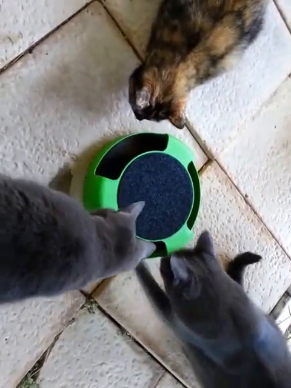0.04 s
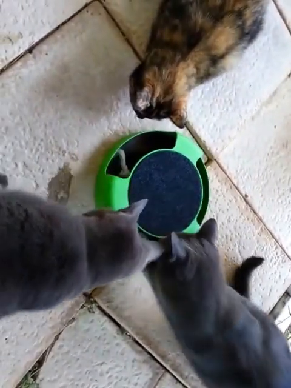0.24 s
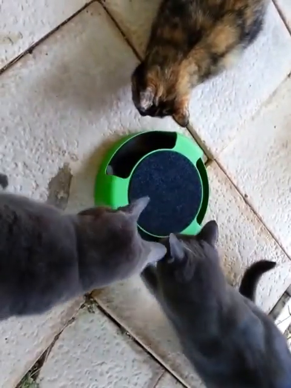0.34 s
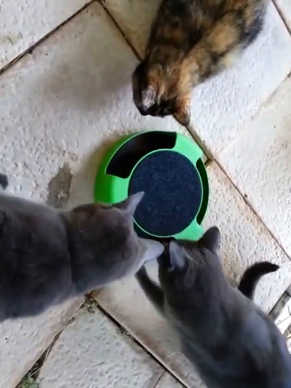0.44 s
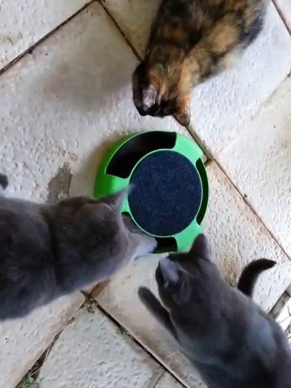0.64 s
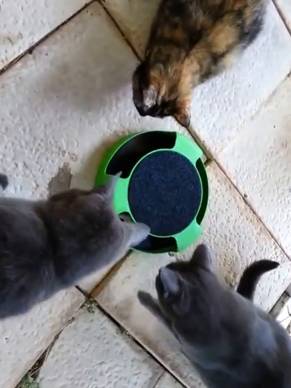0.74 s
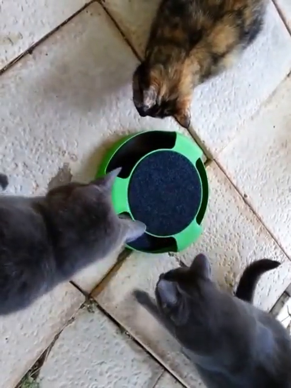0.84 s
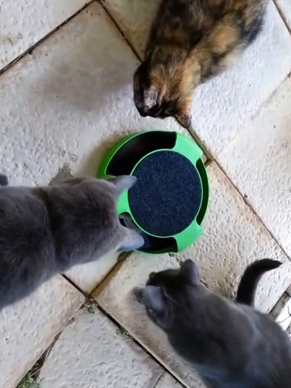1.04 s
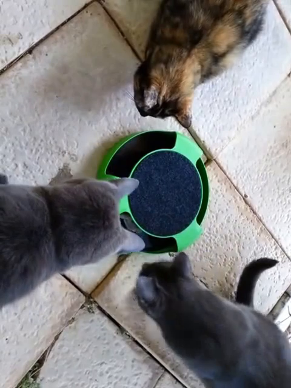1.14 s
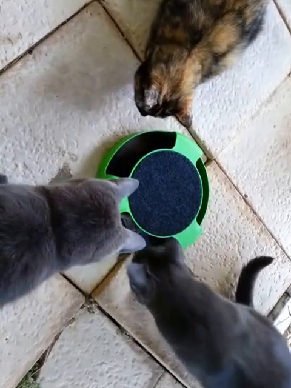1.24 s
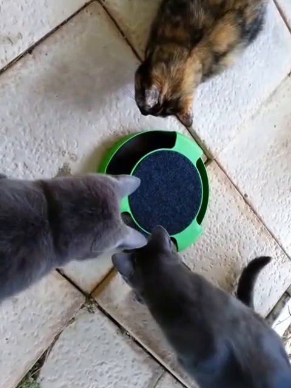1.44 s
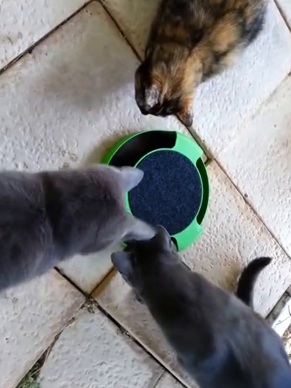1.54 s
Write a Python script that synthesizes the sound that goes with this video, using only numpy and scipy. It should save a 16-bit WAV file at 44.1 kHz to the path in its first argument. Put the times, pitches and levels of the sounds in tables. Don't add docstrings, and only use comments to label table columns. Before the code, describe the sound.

A hollow plastic cat toy is shoved across floor tiles in one quick clattering scrape, then near silence: soft hiss, faint bird whistles, tiny claw ticks, a distant low engine; close stereo phone microphone in a tiled room.

```python
import sys
import numpy as np
from scipy import signal
from scipy.fft import rfft, irfft
from scipy.io import wavfile
from scipy.ndimage import uniform_filter1d

SR = 44100
rng = np.random.default_rng(int(sys.argv[2]) if len(sys.argv) > 2 else 0)


def makeup_ratio(level_db):
    decades = np.asarray(level_db, float) / 20
    return 10 ** decades


def unload_wav(signal):
    wavfile.write(
        sys.argv[1],
        SR,
        np.round(np.clip(np.atleast_2d(signal).T, -1, 1) * 32767).astype(np.int16),
    )


N = 70560


def evened(x):
    return x / np.sqrt(np.mean(x ** 2) + 1e-20)


def read(points, hz):
    f, value = np.transpose(points)
    return np.interp(np.log(hz + 1), np.log(f + 1), value)


def add(mix, s, sound):
    part = mix[..., round(s * SR):][..., :sound.shape[-1]]
    part += sound[..., :part.shape[-1]]


def colour(x, db_of_hz):
    return irfft(rfft(x) * makeup_ratio(db_of_hz(np.fft.rfftfreq(N, 1 / SR))), N)


def ring(modes, db, luck):
    contact_s, detune, spread_db = 0.00071, 0.0082, 2
    scatter_rad = 0.71
    turn_rad, turn_hz = 0.52, 1200
    t = np.arange(6000) / SR
    side = np.array([[1], [-1]])
    swell = 1 - np.exp(-t / contact_s)
    out = np.zeros((2, len(t)))
    for (hz, mode_db, t60), (a, b, c, e) in zip(modes, luck):
        decay = makeup_ratio(db + mode_db + spread_db * a - 60 * t / max(t60, .003))
        phase = 2 * np.pi * hz * (1 + detune * b) * t + scatter_rad * c
        out += decay * swell * np.sin(phase + side * turn_rad * e * (hz > turn_hz))
    return out


# start_s, base_db, lid_db, shell_db, rim_db
KNOCKS = [(0.1715, -47.0, -51.0, -55.0, -55), (0.176, -56, -55.0, -41.5, -47.0),
          (0.1966, -49.0, -40, -32.0, -33.0), (0.201, -45, -53.0, -35.0, -61),
          (0.206, -41, -42, -40.5, -44), (0.2165, -41.0, -52, -40.5, -46), (0.222, -44, -48.0, -41, -49),
          (0.226, -39.0, -39, -37.5, -42), (0.229, -26, -30.0, -36, -31.0), (0.2334, -21, -29, -37.0, -30),
          (0.238, -24.0, -35.0, -33, -37.0), (0.243, -12.0, -24, -20.5, -29),
          (0.2454, -11.5, -20, -26.5, -18), (0.2485, -17.5, -20, -36, -21.5),
          (0.2525, -30, -29, -33, -25.5), (0.2555, -21.0, -17.0, -25.5, -55.0),
          (0.2595, -19, -13.0, -24.5, -29), (0.263, -27, -15.0, -62.0, -29),
          (0.2665, -62.0, -29.0, -23.0, -31.0), (0.272, -41, -33, -29.5, -28.5),
          (0.276, -22.5, -27, -24.5, -29), (0.281, -23.0, -22.5, -26.5, -33.0),
          (0.286, -30.0, -26, -31, -38), (0.293, -19.0, -26, -33.0, -40), (0.2986, -16.0, -21.5, -30, -36),
          (0.301, -18, -16, -24.0, -39), (0.304, -19, -15.0, -30, -32.5), (0.311, -21.0, -23, -29.0, -33.5),
          (0.3134, -27, -24.0, -31.0, -29.5), (0.321, -23, -32.0, -36, -58),
          (0.326, -31, -36.0, -35.5, -48), (0.337, -32, -36, -45, -53), (0.35, -32.5, -49.0, -49, -55),
          (0.361, -44, -43.0, -54, -52.0), (0.381, -48.0, -45.0, -52.0, -49)]
# pitch_hz, level_db, t60_s
BASE_MODES = [(907.3, -2.5, .027), (845, -19, 0.031)]
LID_MODES = [(1029, -3.5, .023), (1148, -14, 0.019)]
SHELL_MODES = [(1307, -2.5, 0.029), (1446, 1, 0.022), (1621, 5.5, 0.022), (1713, 3.5, 0.027),
               (1878, -2.5, 0.028), (2110, -8.5, 0.01), (2275, -3.5, 0.041), (2430, -2.5, 0.022)]
RIM_MODES = [(2660, -4, 0.017), (2840, -3, .02), (3000, 4.5, 0.025), (3330, -3.5, 0.025), (3620, -1, 0.027),
             (3860, 5.5, 0.022), (4100, 1, 0.011), (4900, -23, 0.023), (6470, -20, 0.011),
             (7360, -13, 0.013), (7910, -12, 0.016), (8640, -13.5, .012), (9400, -17.5, 0.012)]


def toy():
    crack_db, crack_s, scatter_rad = -13.5, 0.0021, 0.71
    rings, cracks = np.zeros((2, N)), np.zeros(N)
    luck = rng.standard_normal((40, 2, 14, 4))
    crack = np.exp(-np.arange(600) / SR / crack_s)
    for (s, base_db, lid_db, shell_db, rim_db), (a, b) in zip(KNOCKS, luck):
        for modes, db in (BASE_MODES, base_db), (LID_MODES, lid_db):
            in_step = [(0, 0, 2 * np.pi * hz * s / scatter_rad, 0) for hz, _, _ in modes]
            add(rings, s, ring(modes, db, in_step))
        add(rings, s, ring(SHELL_MODES, shell_db, a) + ring(RIM_MODES, rim_db, b))
        add(cracks, s, makeup_ratio(rim_db + crack_db) * crack)
    return rings, cracks


# time_s, level_db
SKID_FORCE = [
    (.168, -65),
    (0.177, -53.5),
    (0.196, -52.5),
    (0.197, -46.5),
    (0.219, -46.5),
    (0.243, -39.5),
    (0.272, -36),
    (0.314, -49.5),
    (.37, -67),
]
# pitch_hz, level_db (per Hz)
GRIT_COLOUR = [(59, -57), (100, -20.5), (500, -14), (616, -20), (917, -11), (1200, -15.5), (3960, -17.5),
               (4580, -18.5), (14800, -41)]


def skid(cracks):
    grains_per_s, grain_s, spread_db, level_db, apart_hz = 5000, 0.0011, 2.5, 7.5, 1800
    sizes = makeup_ratio(spread_db * np.minimum(rng.exponential(1, N), 3))
    hits = sizes * (rng.random(N) < grains_per_s / SR)
    grain = np.exp(-np.arange(600) / SR / grain_s)
    texture = evened(np.sqrt(abs(signal.fftconvolve(hits ** 2, grain)[:N])))
    s, db = np.transpose(SKID_FORCE)
    force = makeup_ratio(level_db + np.interp(np.arange(N) / SR, s, db, -120, -120))
    force = force * texture + cracks
    a, b = evened(colour(rng.standard_normal((2, N)), lambda hz: read(GRIT_COLOUR, hz)))
    apart = colour(b - a, lambda hz: -10 * np.log10(1 + (apart_hz / (hz + 1)) ** 2) - 3)
    return force * np.array([a, a + apart])


# start_s, boom_db, hollow_db
THUMPS = [
    (0.198, -53, -43),
    (0.233, -36, -40),
    (0.242, -29, -37),
    (0.26, -49, -40),
    (.28, -37, -35),
    (0.298, -33, -38),
    (.325, -66, -37),
    (0.347, -46, -38),
]
# pitch_hz, level_db, t60_s
HOLLOW_MODES = [(213, -4.5, 0.088), (307, -1.5, 0.088), (360.7, 2, 0.069), (492, -3, 0.062),
                (740, -4.5, 0.048)]


def thumps():
    boom_hz, rise_s, t60_s = 139.7, 0.0062, 0.13
    out, t = np.zeros((2, N)), np.arange(12000) / SR
    luck = rng.standard_normal((12, 14, 4))
    for (s, boom_db, hollow_db), lot in zip(THUMPS, luck):
        shape = makeup_ratio(boom_db - 60 * t / t60_s) * (1 - np.exp(-t / rise_s)) ** 2
        add(out, s, shape * np.sin(2 * np.pi * boom_hz * (t + s)))
        add(out, s, ring(HOLLOW_MODES, hollow_db, lot))
    return out


# start_s, level_db, pitch_hz, t60_s
TICKS = [
    (0.0152, -44, 3280, 0.0083),
    (.048, -45, 3200, 0.0029),
    (.147, -47, 2820, 0.0065),
    (1.299, -46, 1100, .004),
    (1.308, -45, 1490, 0.0032),
    (1.417, -52, 3850, .006),
    (1.419, -45, 1300, 0.0027),
    (1.4192, -48, 2598, .0025),
    (1.552, -53, 3000, 0.012),
    (1.554, -48, 1600, .005),
]


def claws():
    out, t = np.zeros((2, N)), np.arange(2000) / SR
    for s, db, hz, t60 in TICKS:
        decay = makeup_ratio(db - 60 * t / max(t60, .002))
        add(out, s, np.ones((2, 1)) * decay * np.sin(2 * np.pi * hz * t))
    return out


# start_s, length_s, level_db, start_hz, end_hz
BIRD_NOTES = [(.01, 0.038, -63, 3020, 3000), (0.129, .02, -61, 3270, 3500), (.508, .012, -64, 2950, 3000),
              (.522, 0.018, -60, 3050, 3050), (0.543, 0.02, -64, 3060, 3000),
              (0.569, .025, -67, 3060, 3050), (0.663, .013, -63, 4630, 4560),
              (.674, 0.016, -54.5, 4540, 4450), (0.685, 0.0108, -55, 4350, 4050),
              (.702, 0.02, -60.5, 3440, 3580), (.719, 0.01, -55, 3520, 3450),
              (0.734, 0.013, -58, 3600, 3560), (.749, .011, -61, 3500, 3580),
              (0.712, 0.031, -61, 3060, 3250), (.745, 0.033, -64, 3050, 3000),
              (.796, .014, -63, 3200, 3180)]


def bird():
    fuzz_hz, pan_db = 130, 6
    out, luck = np.zeros((2, N)), rng.standard_normal((20, 2, 8000))
    r = np.exp(-2 * np.pi * fuzz_hz / SR)
    for (s, length, db, start_hz, end_hz), breath in zip(BIRD_NOTES, luck):
        t = np.arange(0, length, 1 / SR)
        a, b = [evened(signal.lfilter([1], [1, -2 * r, r * r], noise)) for noise in breath]
        flutter = 1 + 0.44 * a + .4j * b
        glide_hz = start_hz + (end_hz - start_hz) * t / length
        note = np.exp(2j * np.pi * np.cumsum(glide_hz) / SR)
        shape = np.sin(np.pi * t / length) * (note * flutter[-len(t):]).real
        add(out, s, makeup_ratio(db + pan_db * np.array([[.5], [-.5]])) * shape)
    return out


# time_s, pitch_hz, level_db
DRONE = [
    (1.118, 63.47, -110),
    (1.199, 72.33, -55.5),
    (1.27, 74.14, -62.5),
    (1.36, 75.1, -59.5),
    (1.448, 73.3, -61),
]
# multiple of pitch, level_db
DRONE_ORDERS = [(2, -2), (3, -3), (4, 0)]


def drone():
    t, (s, hz, db) = np.arange(N) / SR, np.transpose(DRONE)
    turns = np.cumsum(np.interp(t, s, hz)) / SR
    orders = sum(makeup_ratio(d) * np.sin(2 * np.pi * k * turns + k) for k, d in DRONE_ORDERS)
    return makeup_ratio(np.interp(t, s, db, -120, -120)) * orders


# pitch_hz, correlation (-1 to 1)
LIKENESS = [(60, 0.9), (180, 0.77), (540, 0.35), (1600, -0.14), (4790, -0.015), (14300, 0.037)]


def floor(spectrum, db, low_hz, high_hz, hum_db):
    hum_hz, hum_width_hz, patch_db = 161, 25, .8
    frames, hz = N // 512 + 5, np.fft.rfftfreq(2048, 1 / SR)
    a, b, c, d, patches = rng.standard_normal((frames, 1025, 5)).T
    patches = uniform_filter1d(uniform_filter1d(patches, size=8, axis=0), size=6, axis=1)
    same = np.clip(read(LIKENESS, hz), -1, 1)[:, None]
    left = a + 1j * b
    z = np.array([left, same * left + np.sqrt(1 - same ** 2) * (c + 1j * d)])
    shape = read(spectrum, hz) + hum_db * np.exp(-((hz - hum_hz) / hum_width_hz) ** 2)
    band = (hz > low_hz) & (hz <= high_hz)
    z *= makeup_ratio(shape[:, None] + patch_db * evened(patches)) * band[:, None]
    return makeup_ratio(db) * evened(signal.istft(z, nperseg=2048, noverlap=1536)[1][:, :N])


# pitch_hz, level_db (per Hz)
AIR_COLOUR = [(15, -69), (25, -99), (69, 0.5), (128, -6), (157, -2), (189, -4.5), (300, -6), (334, -8),
              (1000, -15), (1300, -49), (2200, -120)]
# time_s, level_db
MURMUR = [(0, 2), (.2, 0.5), (.5, 3), (.7, 0), (1.0, 1), (1.25, 0), (1.6, 0.5)]


def murmur():
    swell = makeup_ratio(np.interp(np.arange(N) / SR, *np.transpose(MURMUR)))
    return floor(AIR_COLOUR, -53.5, 20, 1000, 3.5) * swell


# pitch_hz, level_db (per Hz)
HISS_COLOUR = [(410, -29), (700, -5), (1230, -7), (1320, -7), (2260, -9.5), (3820, -11), (5750, -18),
               (12200, -16), (14800, -18.5)]
# time_s, level_db
RUSTLES = [
    (.46, 3.7),
    (.95, 1.9),
    (1.33, 0.24),
]


def hiss():
    t, rustle_s = np.arange(N) / SR, 0.08
    lift_db = sum(db * np.exp(-((t - s) / rustle_s) ** 2) for s, db in RUSTLES)
    return floor(HISS_COLOUR, -58.5, 1000, 16000, 0) * makeup_ratio(lift_db)


# pitch_hz, t60_s
ROOM = [(150, 0.16), (500, 0.5), (1500, 0.51), (4000, 0.25), (10000, 0.22)]


def room(x):
    taps = np.zeros((2, SR))
    at = np.arange(200, SR - 20, 20) + rng.integers(0, 20, (2, (SR - 201) // 20))
    np.put_along_axis(taps, at, rng.choice([-1., 1.], at.shape), 1)
    hz, t, z = signal.stft(taps, SR, nperseg=256)
    decay = makeup_ratio(-60 * t / np.maximum(read(ROOM, hz), .05)[:, None])
    tail = signal.istft(z * decay, SR, nperseg=256)[1]
    return signal.fftconvolve(x, tail / np.linalg.norm(tail[0]), axes=1)[:, :N]


# pitch_hz, left-right level_db, left lead_rad
PORTS = [(200, 0, 0), (1000, .5, -.1), (1700, 2, -.3), (2300, 9, -.9), (3000, 8.5, -1.8), (3900, 6, -2.2),
         (5000, 1, -2.6), (8000, -8, -4.1), (14000, -1, -7)]


def ports(x):
    hz, (f, db, lead) = np.fft.rfftfreq(N, 1 / SR), np.transpose(PORTS)
    side = np.array([[.5], [-.5]])
    turn = np.exp(1j * side * np.interp(hz, f, lead))
    return irfft(rfft(x) * makeup_ratio(side * np.interp(hz, f, db)) * turn, N)


def scene():
    rings, cracks = toy()
    rings = rings + thumps()
    grit, far = skid(cracks), bird()
    wet = room(makeup_ratio(-23.5) * rings + makeup_ratio(-6.5) * grit + makeup_ratio(-5) * far)
    return ports(rings + grit) + claws() + far + wet + drone() + murmur() + hiss()


def low_pass(x):
    return signal.sosfilt(signal.butter(12, 14780, fs=SR, output="sos"), x)


def record(dry):
    low_cut_hz, edge_hz = 60, 14760

    def response_db(hz):
        return -10 * np.log10(1 + (low_cut_hz / (hz + 1)) ** 4) - 80 * (hz > edge_hz)

    return low_pass(colour(dry, response_db))


dry = scene()
out = record(dry)
unload_wav(out)
```